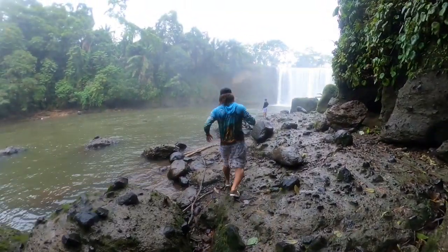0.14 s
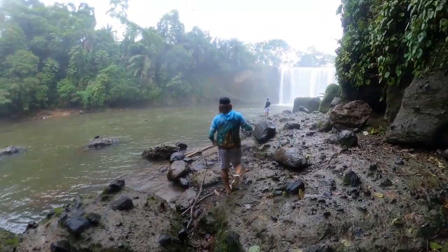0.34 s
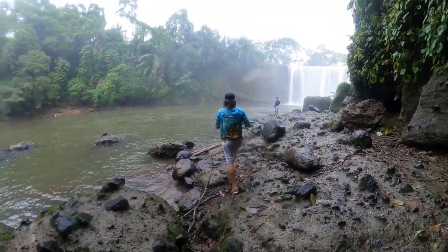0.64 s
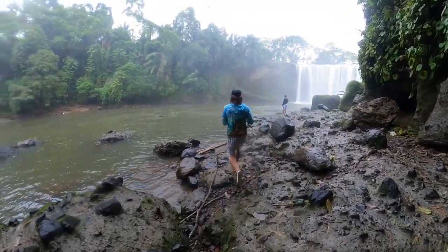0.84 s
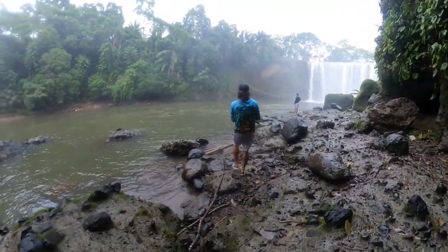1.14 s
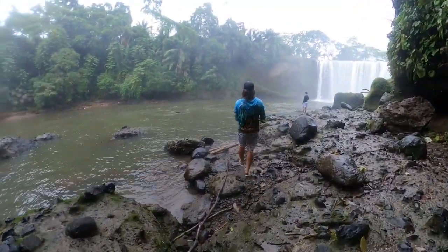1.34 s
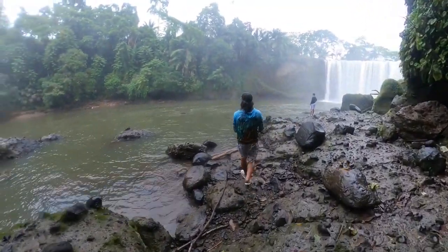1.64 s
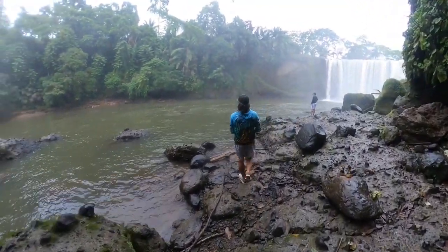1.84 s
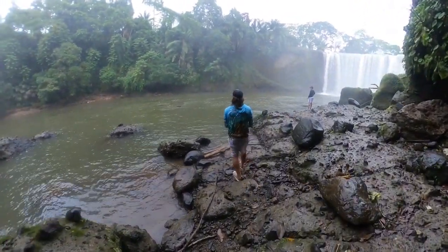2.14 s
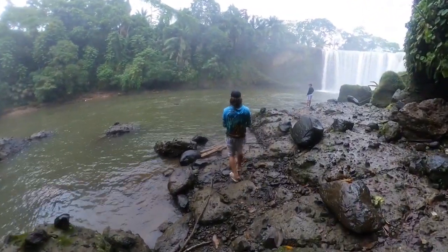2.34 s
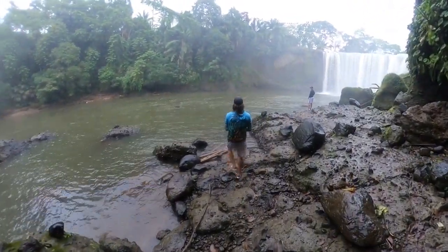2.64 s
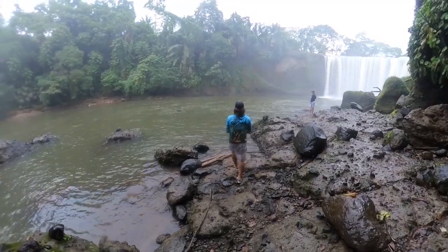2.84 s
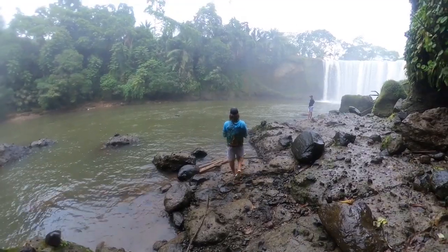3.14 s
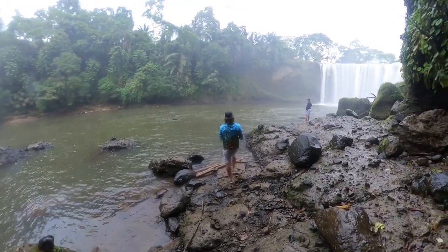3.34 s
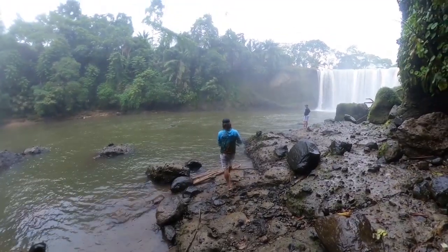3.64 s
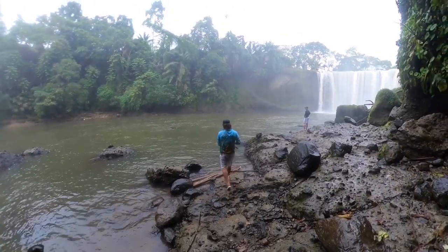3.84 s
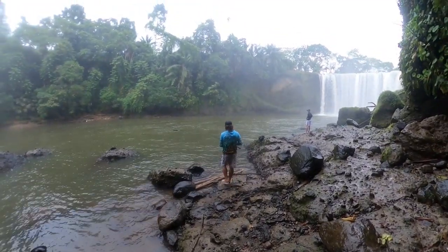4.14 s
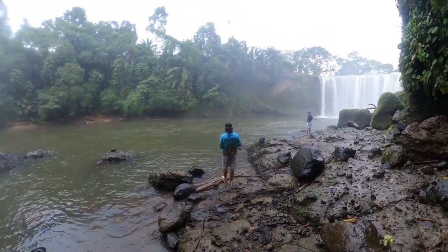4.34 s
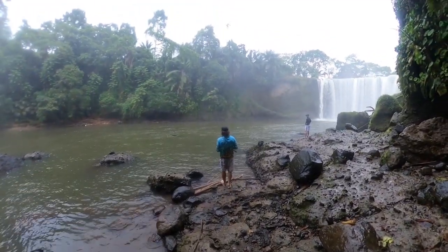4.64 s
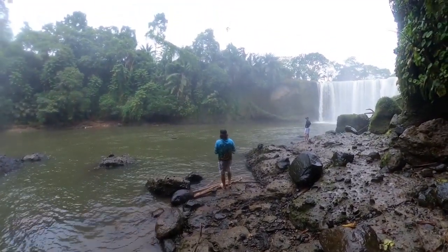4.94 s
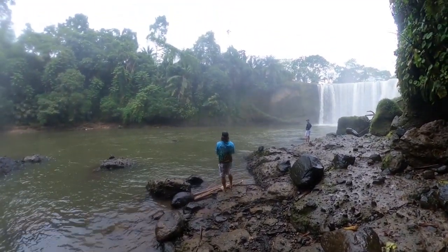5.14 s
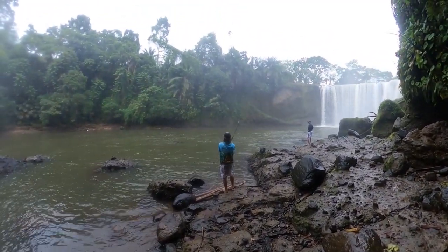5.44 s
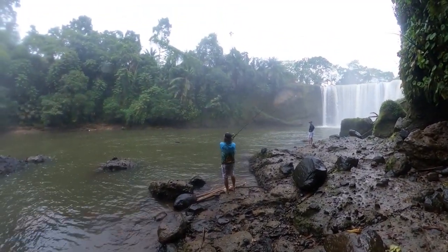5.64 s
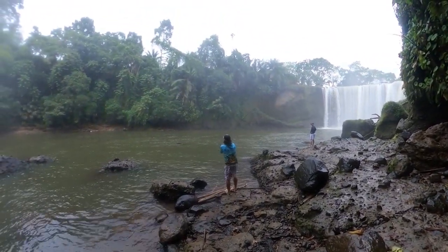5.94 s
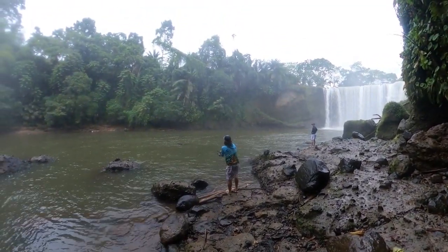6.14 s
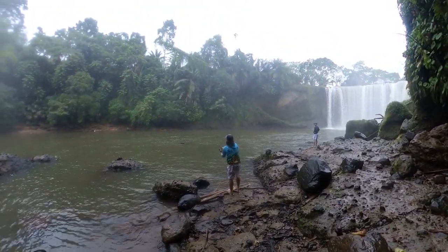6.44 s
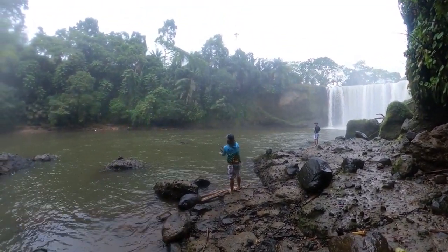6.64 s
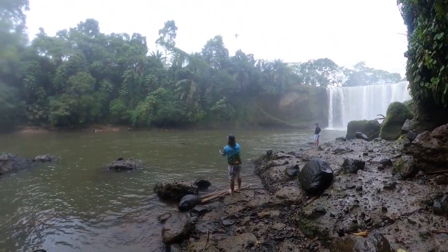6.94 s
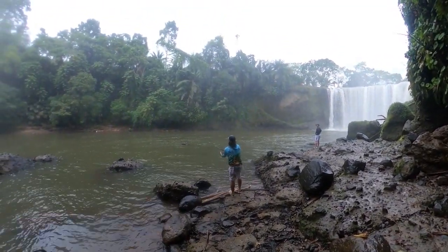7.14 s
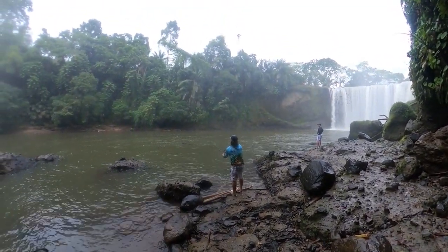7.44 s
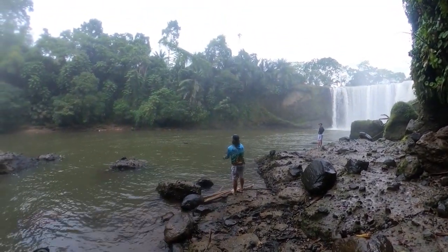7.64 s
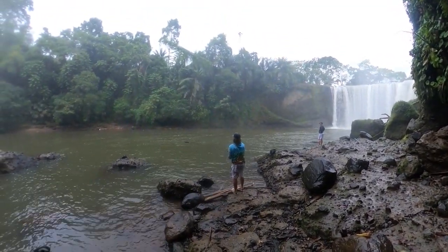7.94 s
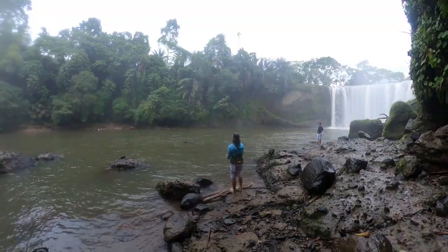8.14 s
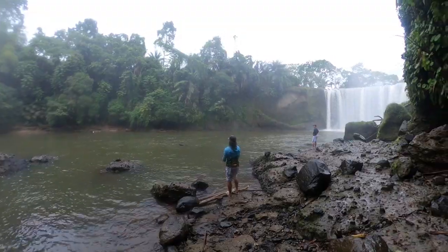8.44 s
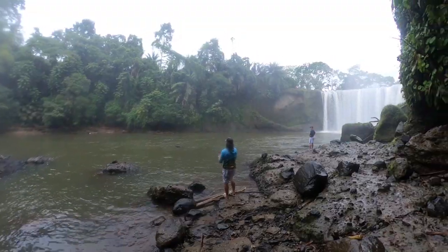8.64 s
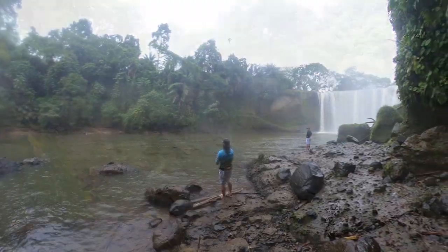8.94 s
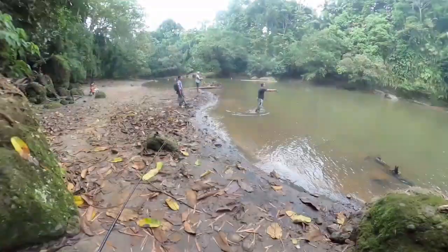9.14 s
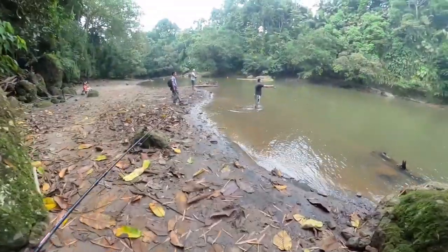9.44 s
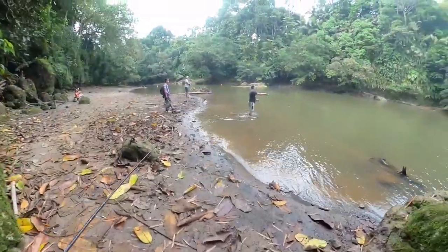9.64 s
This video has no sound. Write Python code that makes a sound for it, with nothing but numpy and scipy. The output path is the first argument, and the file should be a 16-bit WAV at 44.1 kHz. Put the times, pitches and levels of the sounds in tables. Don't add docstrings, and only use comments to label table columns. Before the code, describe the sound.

Continuous pounding waterfall, rumbling and hissing with a few wind thumps, gives way at the end to soft gusts, stirring leaves and small wooden knocks.

```python
import sys
import numpy as np
from scipy import signal
from scipy.fft import rfft, irfft, next_fast_len
from scipy.io import wavfile
from scipy.ndimage import uniform_filter1d

SR = 44100
rng = np.random.default_rng(int(sys.argv[2]) if len(sys.argv) > 2 else 0)


def amplitude_ratio(level_db):
    exponent = np.asarray(level_db, float) / 20
    return 10 ** exponent


def to_wav(sig):
    pcm = np.clip(np.atleast_2d(sig), -1, 1) * 32767
    pcm = np.round(pcm).astype(np.int16)
    wavfile.write(sys.argv[1], SR, pcm.T)


N = 432180
SIZE = next_fast_len(N)
HZ = np.maximum(np.arange(SIZE // 2 + 1) * SR / SIZE, 1)

# pitch in
# Hz, left level in dB per Hz, right level in dB per Hz, likeness of the ports from 0 to 1, lead of the right
FALL_COLOUR = [(22, -48, -45.4, .996, -.12), (40, -44, -41.7, .999, -.09), (54, -41, -38.8, .999, -.07),
               (73, -39.5, -37.4, 1, -.06), (96, -48, -46.1, .999, -.05), (148, -46, -44.3, .999, -.02),
               (190, -52.5, -51.2, .998, 0), (260, -53.6, -53, .998, .01), (380, -60.5, -60.5, .995, .03),
               (497, -62, -64, 1, .07), (596, -59, -62.5, 0.93, 0.173), (719, -50.5, -60, 1, 0.34),
                 (828, -45.5, -59.5, 0.96, 1.53), (918, -52.5, -62, 0.93, 2.56),
                 (1055, -64.5, -66, 0.96, 2.68),
               (1138, -58, -60.5, 0.98, 3.03), (1262, -53.5, -55, 1, 2.866), (1485, -52, -53, 0.98, 2.9),
                (1885, -56, -58, 1, 2.65), (2740, -60.5, -63, 0.93, 2.516), (3970, -66, -68, 0.86, 2.186),
                (5860, -71.5, -74.6, 0.9, 1.78), (6130, -69, -71, 0.55, 1.72), (7740, -72, -76, 0.41, 1.4),
               (8080, -74.5, -83.5, .55, 2.2), (8700, -88, -84.5, 0.29, 1.7), (9240, -98.5, -82.5, .1, 2.0),
               (9850, -95, -84, .1, 2.0), (10370, -106, -100.5, .1, 1.1), (11170, -104, -94.5, .2, .3),
               (12000, -104, -104, .28, .3), (12600, -102, -100, 0.4, .1), (13700, -111, -112, .3, 0.11),
               (14300, -112, -104, .5, .1), (15100, -117, -116, .2, .1)]
CROSSOVERS_HZ = 110, 175, 320, 1080, 2500, 5000
# low end in Hz, high end in Hz.
MUTED_HZ = (8960, 11700), (10300, 11000)
# time in seconds, roar in dB, shelter by the wall from 0 to 1.
WALK_PAST_WALL = [(0, -1, 0.26), (.7, -0.8, .5), (1.05, -0.1, 0.82), (1.95, 0.7, 0.98), (2.2, -.5, 0),
                  (3.0, -0.4, 0), (3.5, 0.5, 0), (4.0, 0, 0), (4.7, -.5, 0.04), (5.3, 0, .1),
                  (6.0, 0, 0.03), (7.0, 0, 0.29), (8.0, -0.14, 0.2), (8.85, 0.5, 0)]
LAYER_CENTRES_HZ = 60, 140, 240, 800
OPEN_DB = -23, -29.5, -32.5, -26.5
WALL_DB = 1.7, -4.5, 3.0, -2.2
WALL_LAG_S = .15, -0.016, -.2, 0.
TUMBLE_DB = (0.86, 1.7, 1.2, 0.38)
# time in seconds, swell in dB, pitch in Hz.
SHEETS = [(.01, 9, 140), (3.45, -9, 90), (.27, 4, 60), (.74, 5, 140), (1.23, 6, 240), (1.28, -1, 60),
          (1.38, -7, 60), (1.72, 3.5, 140), (2.19, -5, 60), (2.34, 9, 140), (2.98, 13, 80), (3.25, 7.5, 60),
          (3.77, -2, 200), (3.82, -2, 60), (3.84, 1.5, 800), (3.92, 9, 80), (4.07, 2.5, 60), (4.58, 9, 140),
          (4.85, 1, 300), (4.95, 8, 140), (5.08, 2.5, 140), (5.4, -0.5, 140), (5.52, -3.5, 137),
          (5.97, -2, 141), (7.07, -9, 60), (7.12, 8, 80), (7.74, 1, 168), (8.01, 6, 60), (8.16, -7, 60),
          (8.58, -7, 280)]
# start in seconds, length in seconds, centre in Hz, level in dB,
# port from -1 (right) to 1 (left).
DROPS_AND_WIND = [
    (.775, .03, 13500, -57, .1),
    (1.05, .035, 12800, -52, .1),
    (3.136, 0.042, 29.8, -12, -.9),
    (3.154, 0.016, 524, -20, -.9),
    (3.237, 0.045, 60, -19, 1),
    (3.24, .04, 238, -28, 1),
    (3.51, 0.033, 500, -31, -1.1),
    (3.508, .05, 35, -30, -.9),
    (4.381, .05, 191, -24, 0.99),
    (4.459, 0.053, 244, -28, 0.81),
]
# time in seconds, level in dB.
BANK_WIND = [(9.25, -30), (9.29, -29.5), (9.322, -26), (9.38, -28), (9.418, -37), (9.44, -26), (9.5, -31.5),
             (9.66, -31.5), (9.8, -30.5)]
# pitch in Hz, level in dB per Hz.
BANK_COLOUR = [(11, -34), (18, -7), (49, -9), (63, -4), (80, -15), (183, -24.5), (387, -36.5), (654, -40),
               (1000, -43.5), (1080, -48), (1280, -51), (7000, -96), (9100, -125), (15400, -120)]
# time in seconds, width in seconds, swell in dB.
LEAF_STIRS = [
    (9.318, .02, 11),
    (9.39, .04, 1.5),
    (9.61, 0.045, 3.5),
    (9.72, .05, 2.0),
]
# start in seconds, length in seconds, centre in Hz, level in dB,
# port from -1 (right) to 1 (left).
LEAF_CRACKLES = [
    (9.308, .018, 2600, -50, .01),
    (9.328, .012, 3600, -65, .01),
    (9.262, .008, 3000, -62, .01),
    (9.6, .045, 3300, -64, .01),
    (9.7, .012, 1900, -56, .01),
]
# start in seconds, pitch in Hz, level in dB, 60 dB decay time in seconds.
WOOD_KNOCKS = [
    (9.695, 640, -13.5, 0.016),
    (9.622, 240, -32, 0.0235),
]
# pitch in Hz, signal over step in dB.
MID_GRAIN = [(1040, -2), (1200, -1), (1400, 2), (3000, 3.5), (5600, 4)]
# pitch in Hz, signal over step in dB.
TOP_GRAIN = [(8300, 1), (9000, -5), (9700, -8), (11000, -7), (11720, -7.5)]


def waterfall():
    deep_db, middle_db, upper_db, hollow_db = layer_levels()
    spectrum = ports()
    muted = spectrum * [(HZ > low) & (HZ < high) for low, high in MUTED_HZ]
    deep, middle, upper, hollow, *spray = split(spectrum - muted, CROSSOVERS_HZ)

    left_leaks = drift(14) > np.linspace(.9, 3, N)
    right_leaks = drift(14) > np.linspace(1.1, 1.9, N)
    leaks = uniform_filter1d(1. * np.array([left_leaks, right_leaks]), size=400)
    spray[-1] = spray[-1] + leaks * irfft(muted, SIZE)[:, :N]

    shelter = in_time(WALK_PAST_WALL)[1]
    flicker_db = .12 * drift(1.5) + .22 * drift(6) - .5 * shelter
    hiss = sum(band * amplitude_ratio(flicker_db + 0.21 * drift(27)) for band in spray)
    ducking_db = -.15 * uniform_filter1d(deep_db - np.mean(deep_db), size=9000)

    rumble = amplitude_ratio(deep_db) * evened(deep, 0.05, share=0.49)
    rumble += amplitude_ratio(middle_db) * evened(middle, 0.059, share=0.46)
    rumble += amplitude_ratio(upper_db) * evened(upper, 0.043, share=0.32)
    power = uniform_filter1d(np.mean(rumble ** 2, axis=0), size=900)
    rumble *= (power / np.mean(rumble ** 2) + .05) ** -0.05
    ring = amplitude_ratio(hollow_db) * evened(hollow, .08, share=0.37)
    return rumble + ring + amplitude_ratio(ducking_db - 23.5) * rms_one(hiss)


def layer_levels():
    sheet_width_s, sheet_octaves, tumbles_per_s = 0.023, 0.46, 7.5
    roar_db, shelter = in_time(WALK_PAST_WALL)
    s, db, hz = np.transpose(SHEETS)
    swells = np.exp(-((np.arange(0, N, 50) / SR - s[:, None]) / sheet_width_s) ** 2)
    levels, t = [], np.arange(N) / SR
    layers = zip(LAYER_CENTRES_HZ, OPEN_DB, WALL_DB, WALL_LAG_S, TUMBLE_DB)
    for centre, open_db, wall_db, lag, tumble_db in layers:
        nearness = np.exp(-(np.log2(hz / centre) / sheet_octaves) ** 2)
        sheet_db = (db * nearness) @ swells
        sheet_db = np.interp(np.arange(N) / 50, np.arange(len(sheet_db)), sheet_db)
        echo_db = wall_db * np.interp(t - lag, t, shelter)
        levels.append(open_db + roar_db + echo_db + tumble_db * drift(tumbles_per_s) + sheet_db)
    return levels


def ports():
    colour = FALL_COLOUR
    left_db, right_db, alike, lead = in_pitch(colour)
    alike = np.clip(alike, 0, 1)
    shared, own = rfft(rng.standard_normal((2, SIZE)))
    right = np.exp(1j * lead) * (alike * shared + np.sqrt(1 - alike ** 2) * own)
    low_cut = HZ / np.hypot(HZ, 9.0)
    return low_cut * np.array([amplitude_ratio(left_db) * shared, amplitude_ratio(right_db) * right])


def puffs(rows):
    out = np.zeros((2, N))
    t = np.arange(int(.09 * SR)) / SR
    for s, length, hz, db, port in rows:
        band = signal.butter(3, [hz / 1.2, hz * 1.2], "band", fs=SR, output="sos")
        noise = signal.sosfilt(band, rng.standard_normal(4 * len(t)))
        noise = evened(noise, 0.03, share=.9)[-len(t):]
        swell = (1 - np.exp(-t / .004)) * np.exp(-(t / length) ** 2) * (1 - t / t[-1])
        pan = np.array([[(1 + port) / 2], [(1 - port) / 2]])
        out[:, round(s * SR):][:, :len(t)] += amplitude_ratio(db) * swell * noise * pan
    return out


def riverbank():
    wind_db, = in_time(BANK_WIND)
    t = np.arange(N) / SR
    stir_db = sum(db * np.exp(-((t - s) / width) ** 2) for s, width, db in LEAF_STIRS)
    air = amplitude_ratio(in_pitch(BANK_COLOUR)[0]) * rfft(rng.standard_normal(SIZE))
    wind, murmur, rustle = split(air, [170., 1400.])
    murmur_db = -38.5 + 0.37 * (wind_db + 32) + 0.97 * drift(25)
    rustle_db = -64 + stir_db + 1.3 * drift(30)
    out = amplitude_ratio(wind_db + 4.5) * evened(wind, .04, share=0.67)
    out += amplitude_ratio(murmur_db) * rms_one(murmur) + amplitude_ratio(rustle_db) * rms_one(rustle)
    return out + knocks() + np.mean(puffs(LEAF_CRACKLES), axis=0)


def knocks():
    t, out = np.arange(N) / SR, np.zeros(N)
    for s, hz, db, t60 in WOOD_KNOCKS:
        age = np.maximum(t - s, 0)
        envelope = amplitude_ratio(db - 60 * age / t60) * (1 - np.exp(-age / .002))
        out += envelope * np.sin(2 * np.pi * hz * age)
    return out


def rms_one(x):
    return x / np.sqrt(np.mean(x ** 2) + 1e-20)


def in_time(rows):
    s, *columns = np.transpose(rows)
    return [np.interp(np.arange(N) / SR, s, c) for c in columns]


def in_pitch(rows):
    hz, *columns = np.transpose(rows)
    return [np.interp(np.log(HZ), np.log(hz), c) for c in columns]


def drift(rate):
    r = np.exp(-80 * np.pi * rate / SR)
    slow = signal.lfilter([1], [1, -2 * r, r * r], rng.standard_normal(N // 40 + 2002))[2000:]
    return np.interp(np.arange(N) / 40, np.arange(len(slow)), rms_one(slow))


def split(spectrum, edges_hz):
    above = [1] + [1 / (1 + (hz / HZ) ** 12) for hz in edges_hz] + [0]
    return [irfft(spectrum * (a - b), SIZE)[..., :N] for a, b in zip(above, above[1:])]


def evened(x, span_s, share):
    power = uniform_filter1d(np.mean(np.atleast_2d(x) ** 2, axis=0), size=int(span_s * SR))
    return rms_one(x * (power + 1e-12) ** (-np.clip(share, 0, 1) / 2))


def rounded(x, grain, jitter_db):
    hop, first, group = 1024, 155, 16
    hz, over_db = np.transpose(grain)
    low, high = [int(edge * 2 * hop / SR) // group * group for edge in (hz[0], hz[-1])]
    lines = np.arange(low, high)
    n = np.arange(2 * hop)[:, None] + .5
    window = np.sqrt(2 / hop) * np.sin(np.pi * n / hop / 2)
    basis = window * np.cos(np.pi / hop * (n + hop / 2) * (lines + .5))
    frames = np.lib.stride_tricks.sliding_window_view(x[first:], 2 * hop)[::hop]
    c = frames @ basis
    power = (c ** 2).reshape(len(c), -1, group).mean(axis=2)
    step = np.sqrt(uniform_filter1d(power, size=3, axis=0) + 1e-18)
    step = step * amplitude_ratio(jitter_db * rng.standard_normal(power.shape))
    step = np.repeat(step, group, axis=1) * amplitude_ratio(-np.interp(lines * SR / 2 / hop, hz, over_db))
    snapped = np.sign(c) * np.floor(np.abs(c) / step + .41) * step
    change = (snapped - c) @ basis.T
    out = x.copy()
    for half in (0, hop):
        out[first + half:][:len(c) * hop] += change[:, half:half + hop].ravel()
    return out


def scene():
    fade_start_s, fade_end_s = 8.84, 9.248
    t = np.arange(N) / SR
    fall = np.clip((fade_end_s - t) / (fade_end_s - fade_start_s), 0, 1)
    closing = np.sin(np.pi / 2 * np.minimum((t[-1] - t) / .006, 1)) ** 2
    return fall * (waterfall() + puffs(DROPS_AND_WIND)) + (1 - fall) * closing * riverbank()


def low_pass(x):
    return signal.sosfilt(signal.butter(12, 15140, fs=SR, output="sos"), x)


def record(dry):
    mid = rounded(np.mean(dry, axis=0), MID_GRAIN, jitter_db=2.5)
    side = (dry[0] - dry[1]) / 2
    thinned = np.array([rounded(port, TOP_GRAIN, jitter_db=1.8) for port in (mid + side, mid - side)])
    return low_pass(thinned)


dry = scene()
out = record(dry)
to_wav(out)
```